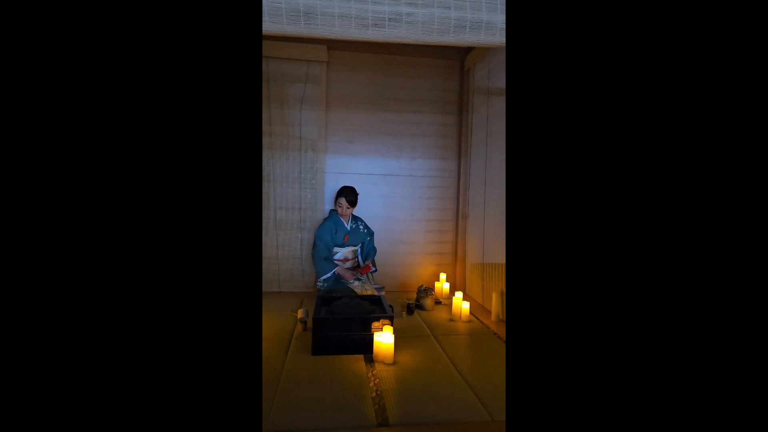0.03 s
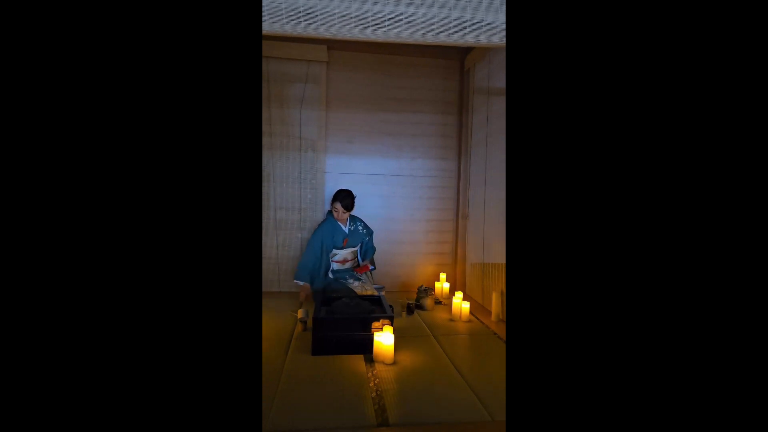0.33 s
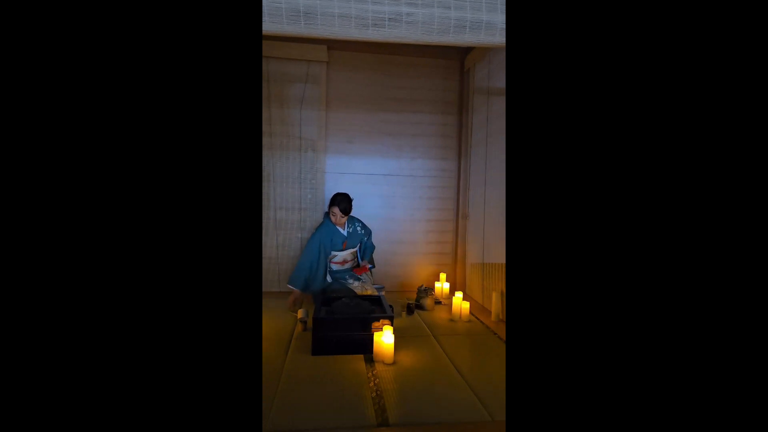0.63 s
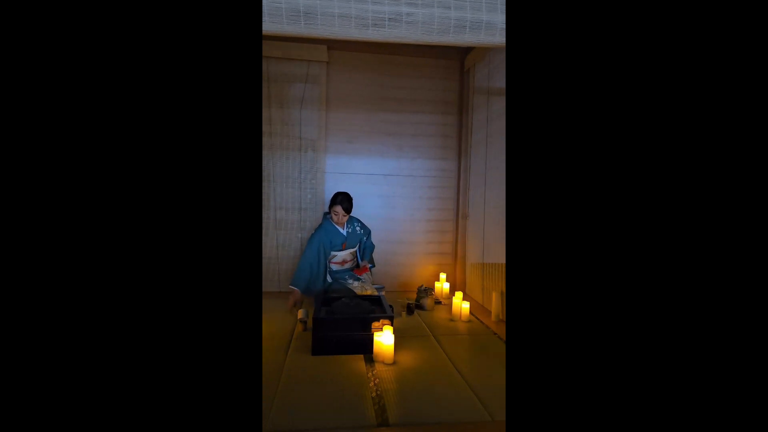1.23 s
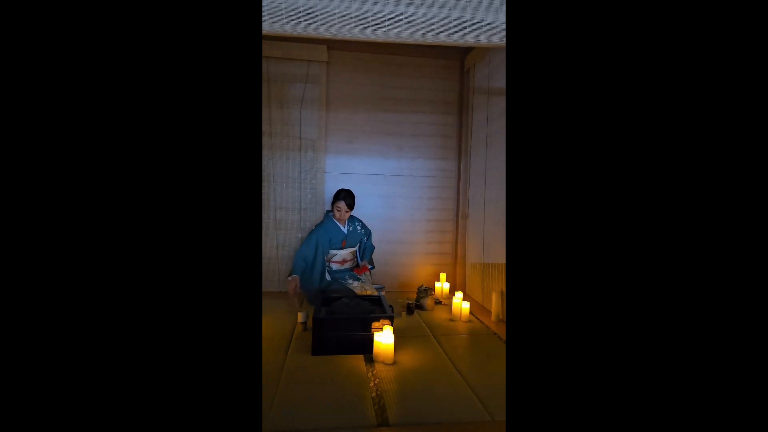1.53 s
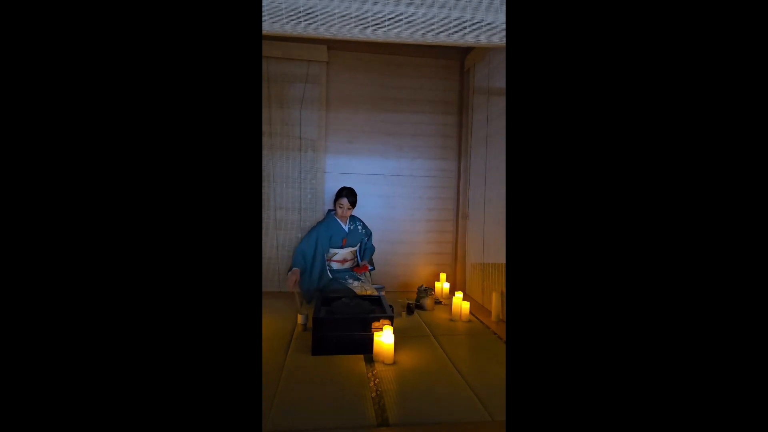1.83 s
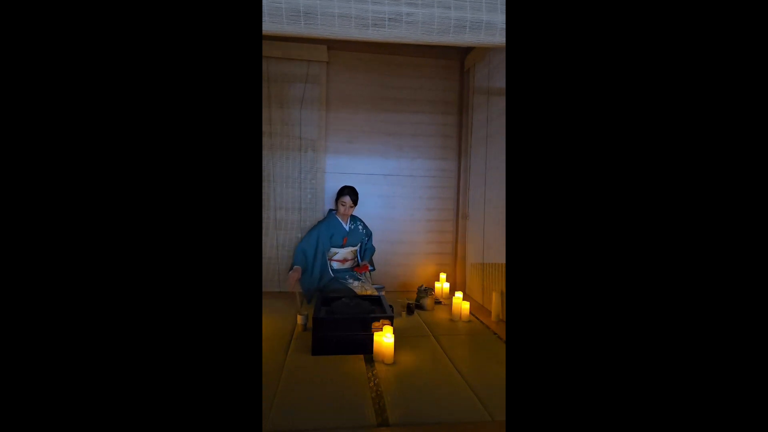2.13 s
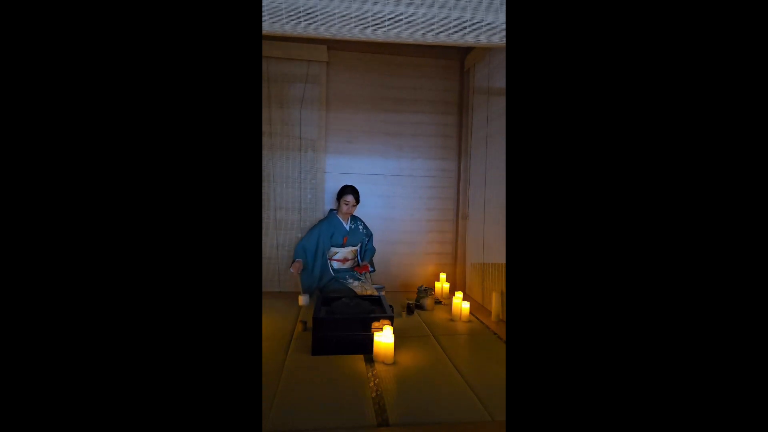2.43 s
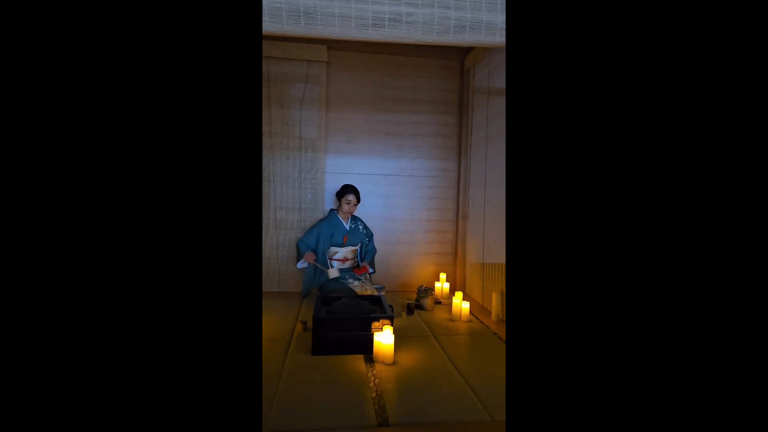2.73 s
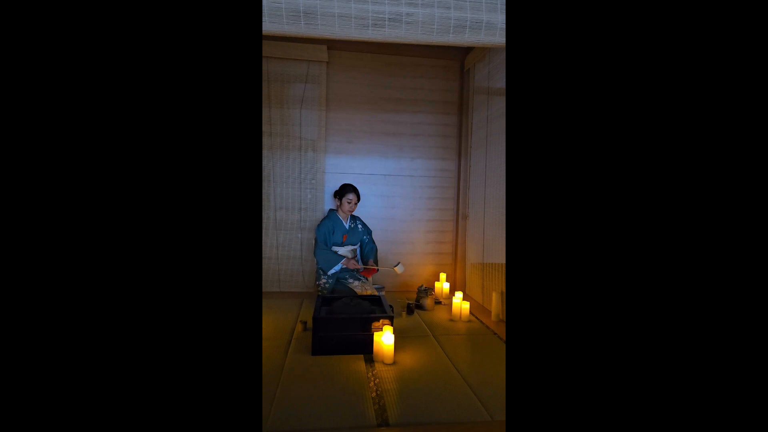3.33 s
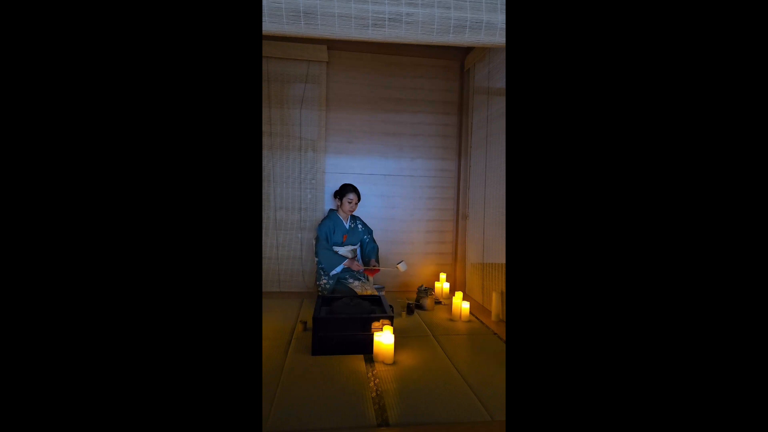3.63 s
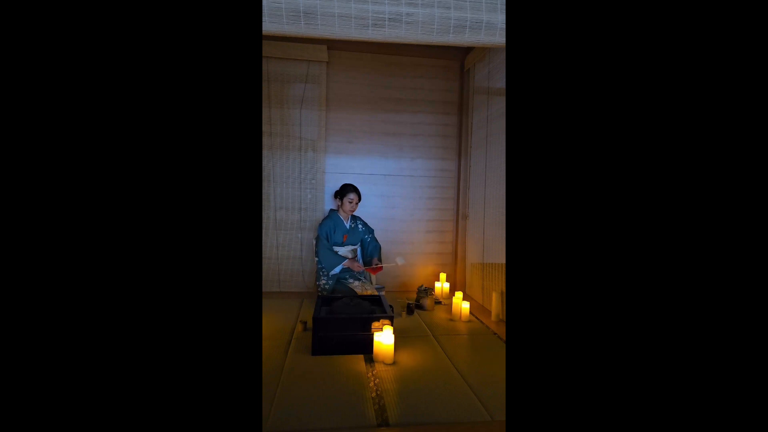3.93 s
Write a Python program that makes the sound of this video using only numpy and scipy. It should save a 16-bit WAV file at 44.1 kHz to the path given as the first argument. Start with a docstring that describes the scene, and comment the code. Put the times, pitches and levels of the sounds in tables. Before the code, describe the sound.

Ventilation rumbles throughout in a small, still room, with gently throbbing fan motors and a steady electric hum. A faint, thin whistle flutters and chirps on the right over a soft hiss. A silk sleeve brushes faintly during the first second as a seated person moves an arm, again at about 1.5 seconds, and several more times from about 3 seconds until the end at 4 seconds.

```python
"""A still, small room with the ventilation running. From the start, air rumbles in the ducts,
fan motors drone and throb against each other, and mains-powered gear hums with a faint buzz.
All along, a thin whistle flutters and chirps on the right over a soft hiss.
In the first second a silk sleeve brushes faintly as a seated person moves an arm.
It brushes again at about 1.5 seconds, and several more times from about 3 seconds to the end."""
import sys
import numpy as np
from scipy import signal
from scipy.fft import rfft, irfft
from scipy.io import wavfile
from scipy.ndimage import uniform_filter1d

SR = 44100
rng = np.random.default_rng(int(sys.argv[2]) if len(sys.argv) > 2 else 0)


def bounce(signal):
    """Save signal as a 16-bit WAV file at the path given by the first command-line argument."""
    frames = np.transpose(np.atleast_2d(signal))
    limited = np.clip(frames, -1, 1)
    pcm = np.round(limited * 32767).astype(np.int16)
    wavfile.write(sys.argv[1], SR, pcm)


N = 176400
T = np.arange(N) / SR
HZ = np.maximum(np.arange(N // 2 + 1) * SR / N, 1e-3)


def from_db(db):
    """Turn decibels into a number to multiply a sound by."""
    return 10 ** (np.asarray(db) / 20)


def noise(gain):
    """Steady noise, with `gain` setting its strength at each pitch."""
    return irfft(rfft(rng.standard_normal(N)) * gain, N) * np.sqrt(SR / 2)


def shaped_noise(points):
    """Noise whose tone follows a table of pitches and levels."""
    hz, db = np.transpose(points)
    return noise(from_db(np.interp(np.log(HZ), np.log(hz), db)))


def ringing_noise(hz, width_hz):
    """Noise that rings around one pitch; its typical size is 1."""
    ring = noise(1 / (1 + ((HZ - hz) / width_hz) ** 2))
    return ring / ring.std()


def drift(rate_hz):
    """A smooth random wobble; its typical size is 1."""
    return ringing_noise(0, rate_hz)


# The tone of the hiss. Columns: pitch_hz, level_db_per_hz
HISS_TONE = [(2500, -125), (4000, -124), (5300, -124), (5750, -127), (6400, -123), (7050, -130),
             (7450, -120), (7850, -126), (8200, -121), (8800, -122), (9250, -142), (11000, -155)]
def hiss():
    """A soft hiss from the left, which reaches the right side weaker and partly scattered."""
    direct, scattered = shaped_noise(HISS_TONE), shaped_noise(HISS_TONE)
    right = from_db(-10) * (direct + scattered) / np.sqrt(2)
    return np.array([direct, right])


# Rumbling air, the same on both sides. Columns: pitch_hz, level_db_per_hz
DUCT_AIR = [(10, -92), (24, -69), (36, -74.5), (47, -59.5), (55, -62.5), (66, -63), (74, -67), (86, -64),
            (108, -67), (142, -63.5), (166, -68), (240, -69.5), (288, -73.5), (316, -83), (405, -82.5),
            (440, -90), (530, -89), (700, -94), (950, -96), (1120, -100), (1430, -100), (1560, -104.5),
            (2030, -104.5), (2280, -116), (4000, -122), (9000, -145)]
# That air bouncing off the walls, opposite on the two sides. Columns: pitch_hz, level_db_per_hz
SCATTERED_AIR = [(15, -89), (60, -81.5), (165, -88.5), (215, -83), (330, -86), (420, -92.5), (560, -98.5),
                 (1000, -100), (1450, -101), (1600, -105), (2000, -108), (2350, -118), (4000, -126),
                 (9000, -145)]
def air_rumble():
    """Air rumbles in the ducts, and its swirling makes the loudness flutter a little."""
    air = shaped_noise(DUCT_AIR) + shaped_noise(SCATTERED_AIR) * np.array([[1], [-1]])
    return air * from_db(1.26 * drift(rate_hz=26.2))


# The tones of the fan motors. Columns: pitch_hz, wander_hz, level_db
MOTOR_TONES = [(47.87, .05, -52), (59.4, .05, -55.5), (63.8, .05, -47.8), (64.9, .1, -56), (79.7, .05, -55),
               (130.2, .05, -53.5), (181, 3, -59.5), (326, 4, -73.5), (388.5, 3, -70), (790, .8, -80.5),
               (889, .8, -80.5), (1011, .8, -79.5), (1450, 10, -89), (1815, 8, -92), (1885, 8, -92),
               (2039, 6, -90.5)]
def fan_drones():
    """Motors hum clean tones that wander in pitch; low ones that lie close together throb."""
    out = np.zeros(N)
    for pitch_hz, wander_hz, level_db in MOTOR_TONES:
        cycles = np.cumsum(pitch_hz + wander_hz * drift(rate_hz=6)) / SR + rng.random()
        out += from_db(level_db) * np.sqrt(2) * np.sin(2 * np.pi * cycles)
    return out


HUM_HZ = 119.97
# The tones of the electric hum. Columns: multiple (of HUM_HZ), left_db, right_db, left_lead_radians
HUM_TONES = [(1, -45, -45, .1), (2, -63, -62, -.1), (3, -68, -72, .7), (4, -72, -77, .2),
             (5, -76, -76, -1.2), (6, -88, -77, -.2), (7, -76, -76, .7), (8, -83, -91, 2.8),
             (9, -85, -91, .4), (10, -84, -82, 1.5), (11, -88, -85, 3.1), (15, -90, -86, -2.5)]
def mains_hum():
    """Gear hums at multiples of twice the mains rate; room echoes place each tone left or right."""
    out = np.zeros((2, N))
    for multiple, left_db, right_db, lead in HUM_TONES:
        phase = 2 * np.pi * (multiple * HUM_HZ * T + rng.random())
        waver = np.sqrt(2) * from_db(1.38 * drift(rate_hz=2.3))
        out[0] += waver * from_db(left_db) * np.sin(phase + lead)
        out[1] += waver * from_db(right_db) * np.sin(phase)
    return out


BAND_TOPS_HZ, SWELL_DEPTH = (100, 167, 270), 0.98
# How three low bands rise and fall, deepest first. Columns: time_s, level_db (before SWELL_DEPTH)
BASS_SWELL = [(0, 3.5), (.12, 3.5), (.28, -2.5), (.52, 4), (.84, -2.5), (.97, 3), (1.09, -3.5), (1.25, 2),
              (1.471, 3), (1.8, -1.5), (2.12, 2), (2.299, -2.5), (2.468, 4.5), (2.8, -1.5), (3.25, 3.5),
              (3.6, -0.5), (3.75, 1), (4, -1.5)]
BOOM_SWELL = [(0, -6.5), (.17, 0.5), (.45, -1.4), (.8, -2.5), (1.5, -2.3), (1.67, 1), (1.8, -4),
              (2.07, 1.5), (2.41, -3.5), (2.66, 1.5), (2.901, -2), (3.27, 2.5), (3.6, -1.5), (3.85, 1.4),
              (4, -9.5)]
LOW_MID_SWELL = [(.03, 5.5), (0.219, -2.5), (0.469, .5), (.65, -5), (1.0, 1), (1.3, -0.5), (1.55, 1.3),
                 (1.85, -0.6), (2.08, 1.8), (2.76, -2), (2.96, 2), (3.15, -2.5), (3.29, 1), (3.75, -2.5),
                 (3.95, 0.5)]
def low_swells(sound):
    """The deep bass, the boom and the band just above each grow louder and softer on their own."""
    below = [np.zeros_like(HZ)] + [1 / (1 + (HZ / top_hz) ** 16) for top_hz in BAND_TOPS_HZ]
    out = sound
    for band_shape, curve in zip(np.diff(below, axis=0), (BASS_SWELL, BOOM_SWELL, LOW_MID_SWELL)):
        band = irfft(rfft(sound) * band_shape, N)
        power = uniform_filter1d((band ** 2).mean(0), int(.3 * SR))   # averaged over 0.3 s
        even_out = np.sqrt(power.mean() / power)
        swell = from_db(SWELL_DEPTH * np.interp(T, *np.transpose(curve)))
        out = out + band * (even_out * swell - 1)
    return out


# The pitches the whistle rings at. Columns: pitch_hz, width_hz, left_db, right_db
WHISTLE_RINGS = [(3175, 28, -99.5, -84.5), (2930, 110, -94.5, -86.5), (3234, 130, -92, -83),
                 (4726, 310, -89.5, -88), (6220, 220, -96, -100)]
# How the whole whistle rises and falls. Columns: time_s, level_db
WHISTLE_SWELL = [(0, 1), (.2, 1), (.3, -3), (.45, -0.5), (.75, 2), (1.03, 0.5), (1.22, -1.5), (1.4, 1),
                 (1.7, 1.5), (1.9, -1), (2.35, -1), (2.6, -0.5), (3.0, 0.5), (3.28, 1.5), (3.45, 1.5),
                 (3.63, 1), (4, 0)]
def whistle():
    """Thin, high ringing, mostly on the right; each pitch flutters while all swell together."""
    out = np.zeros((2, N))
    for pitch_hz, width_hz, *sides_db in WHISTLE_RINGS:
        flutter = from_db(2 * drift(rate_hz=12))
        out += flutter * np.array([from_db(db) * ringing_noise(pitch_hz, width_hz) for db in sides_db])
    return out * from_db(np.interp(T, *np.transpose(WHISTLE_SWELL)))


def bump(middle_s, half_length_s):
    """A bell-shaped fade in and out, reaching 1 in the middle."""
    return np.exp(-.5 * ((T - middle_s) / half_length_s) ** 2)


# The moments when the whistle catches. Columns: middle_s, pitch_hz, right_db
WHISTLE_CHIRPS = [(.035, 3250, -80), (.18, 3185, -76), (.565, 3180, -78.5), (.68, 3187, -80),
                  (.755, 3185, -79), (1.19, 3130, -73), (1.25, 3175, -73.5), (1.335, 3200, -75.5),
                  (1.45, 3170, -76), (1.55, 4720, -82.5), (1.64, 3200, -77), (1.895, 4710, -85),
                  (2.14, 3220, -76), (2.35, 3178, -74), (2.506, 4690, -83), (2.76, 3240, -77.5),
                  (3.07, 3240, -79.5), (3.285, 3180, -72.5), (3.465, 3175, -77), (3.635, 3200, -73.5)]
def chirps():
    """Now and then the whistle catches and sings for a moment on a wavering pitch."""
    right = np.zeros(N)
    waver_hz = 18 * drift(rate_hz=40)
    for middle_s, pitch_hz, right_db in WHISTLE_CHIRPS:
        tone = np.sqrt(2) * np.sin(2 * np.pi * np.cumsum(pitch_hz + waver_hz) / SR)
        right += from_db(right_db) * bump(middle_s, half_length_s=0.014) * tone
    return np.array([from_db(-15.5) * right, right])


# Silk sliding on silk, as heard on each side. Columns: pitch_hz, level_db_per_hz
SWISH_LEFT = [(1500, -125), (2500, -118), (4500, -118), (6800, -122), (8400, -118), (9400, -141),
              (15000, -146)]
SWISH_RIGHT = [(1500, -125), (2500, -116), (3050, -109), (3900, -115), (4700, -114), (5200, -126),
               (8400, -128), (9400, -147)]
# The dull rub of heavier cloth. Columns: pitch_hz, level_db_per_hz
CLOTH_RUB = [(500, -115), (1400, -102), (1720, -101.5), (1900, -96.5), (2080, -102), (2400, -116),
             (3500, -135), (9000, -165)]
# The movements of the arm. Columns: middle_s, half_length_s, swish_db, rub_db
ARM_MOVES = [(0.152, 0.083, -1, -14), (0.425, 0.12, 2, -9), (0.634, 0.022, -5, 0),
             (1.552, 0.13, -6.5, -6.5), (1.745, .08, -6, -10), (2.954, 0.14, -5.5, -7),
             (3.292, 0.13, -3.5, -12.5), (3.55, 0.087, -8.5, -9), (3.899, 0.042, -3, 2.5)]
def sleeve():
    """Cloth slides on cloth: each move is a smooth swell of grainy noise, a swish and a duller rub."""
    swish, rub = np.zeros(N), np.zeros(N)
    for middle_s, half_length_s, swish_db, rub_db in ARM_MOVES:
        speed = bump(middle_s, half_length_s)
        swish += from_db(swish_db) * speed
        rub += from_db(rub_db) * speed
    grain = from_db(1.5 * drift(rate_hz=40))
    sides = [swish * shaped_noise(silk) + rub * shaped_noise(CLOTH_RUB)
             for silk in (SWISH_LEFT, SWISH_RIGHT)]
    return grain * np.array(sides)


def scene():
    """The ongoing sounds of the room, with the sleeve on top."""
    machines = low_swells(air_rumble() + fan_drones() + mains_hum())
    return machines + whistle() + chirps() + hiss() + sleeve()


# The microphones' own faint hiss. Columns: pitch_hz, left_db_per_hz
MIC_HISS = [(3000, -136), (9500, -143), (11800, -137), (12800, -130), (13900, -135), (15300, -134)]
def record(dry):
    """The microphones add a steady hiss, weaker on the right, and the highest treble is cut."""
    mic_hiss = np.array([shaped_noise(MIC_HISS), from_db(-5) * shaped_noise(MIC_HISS)])
    treble_cut = signal.ellip(10, .1, 70, 15500, fs=SR, output="sos")   # cuts above 15500 Hz
    return signal.sosfilt(treble_cut, dry + mic_hiss)


dry = scene()
out = record(dry)
bounce(out)
```